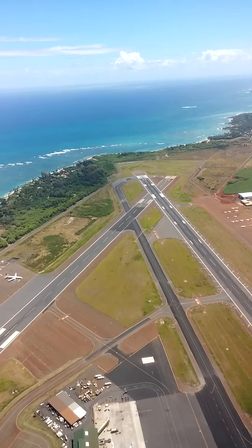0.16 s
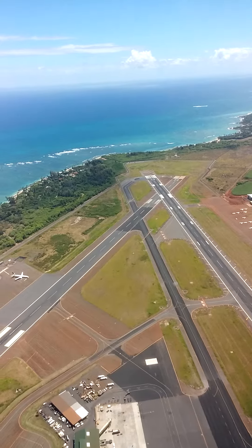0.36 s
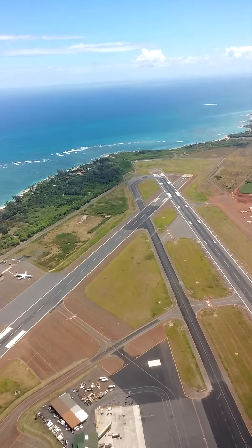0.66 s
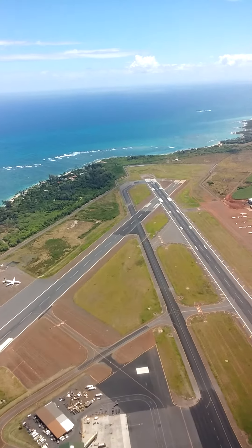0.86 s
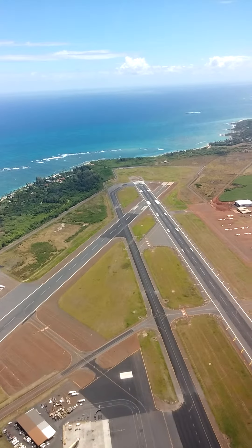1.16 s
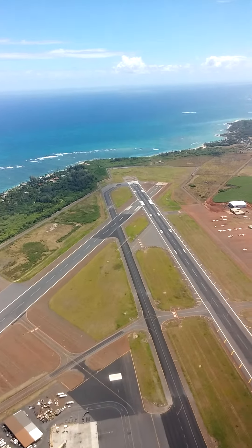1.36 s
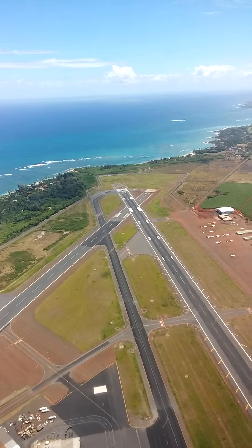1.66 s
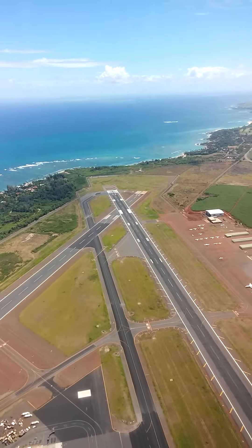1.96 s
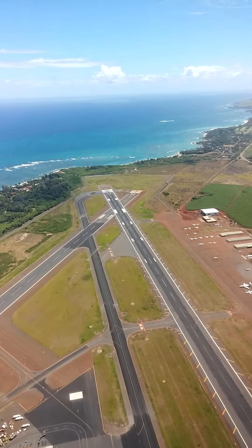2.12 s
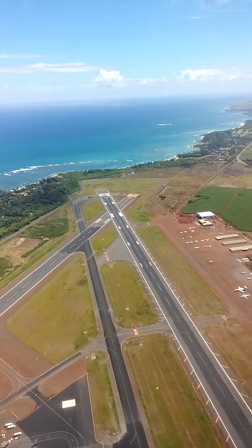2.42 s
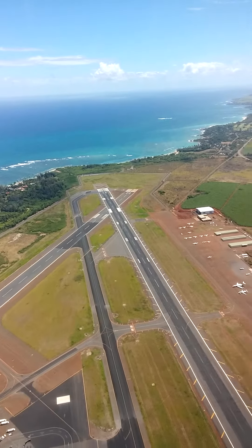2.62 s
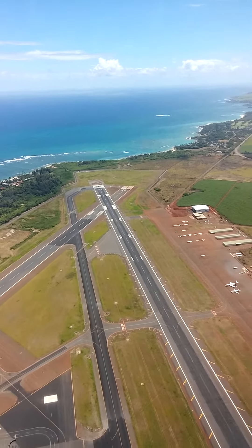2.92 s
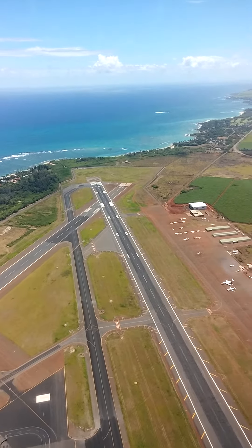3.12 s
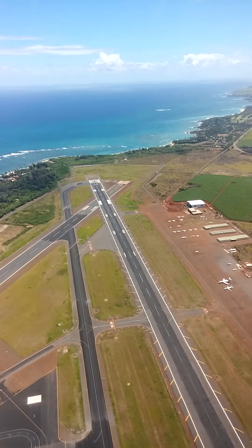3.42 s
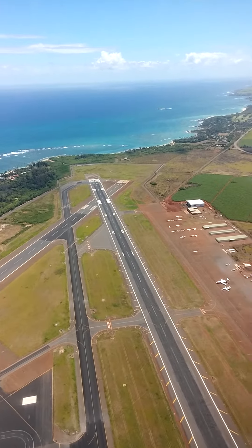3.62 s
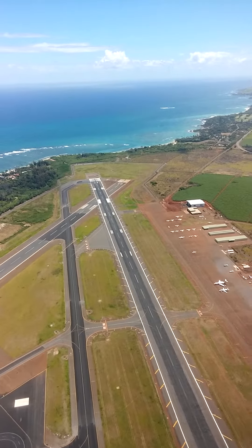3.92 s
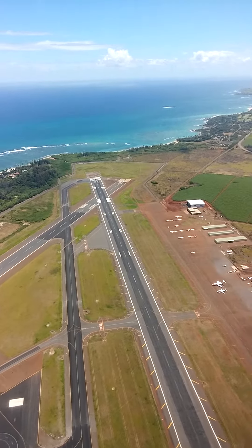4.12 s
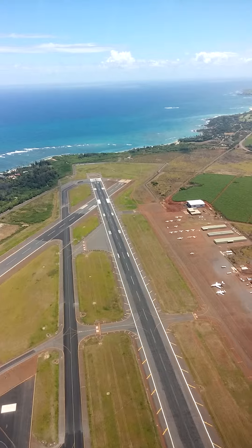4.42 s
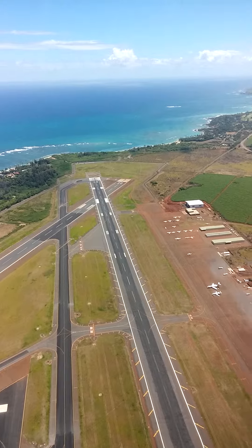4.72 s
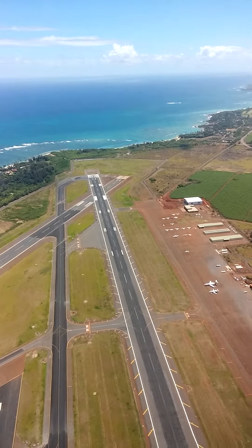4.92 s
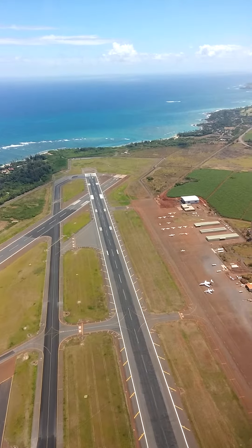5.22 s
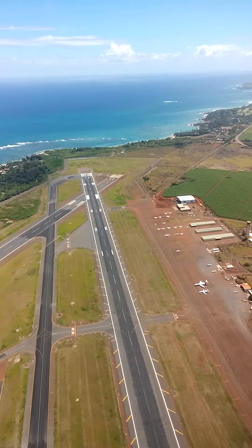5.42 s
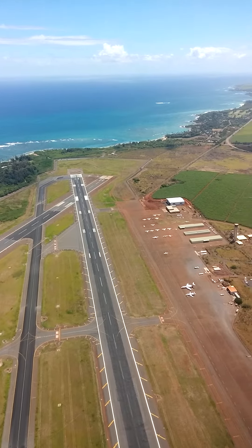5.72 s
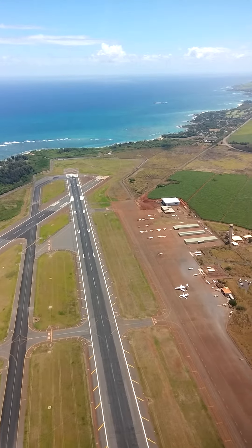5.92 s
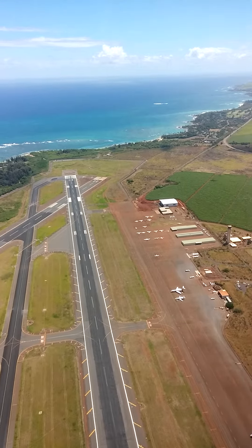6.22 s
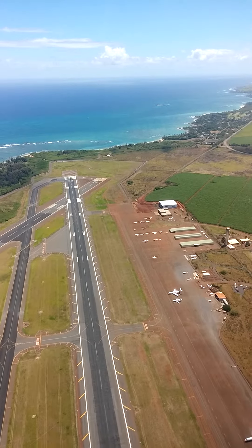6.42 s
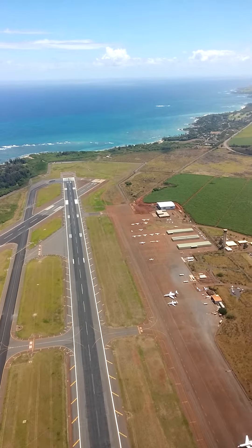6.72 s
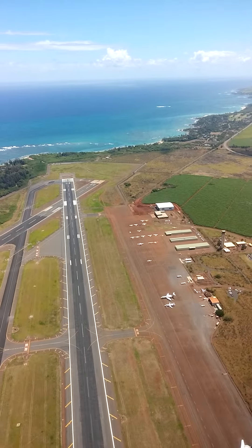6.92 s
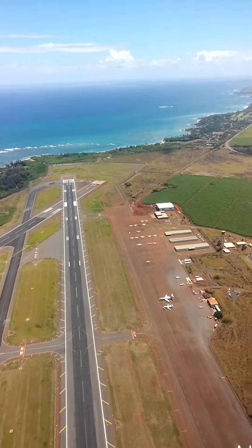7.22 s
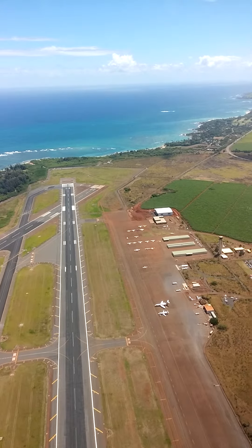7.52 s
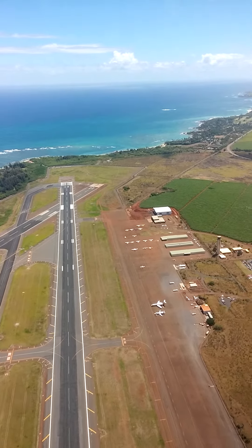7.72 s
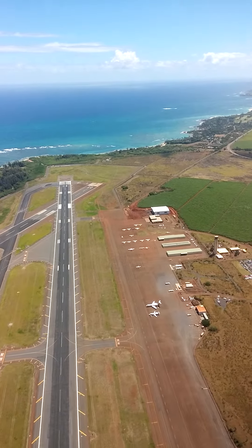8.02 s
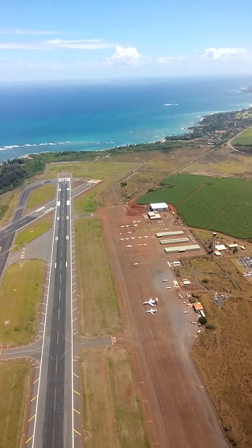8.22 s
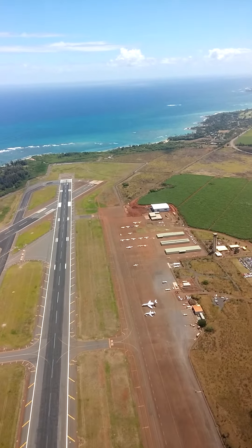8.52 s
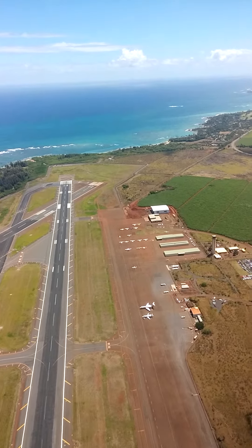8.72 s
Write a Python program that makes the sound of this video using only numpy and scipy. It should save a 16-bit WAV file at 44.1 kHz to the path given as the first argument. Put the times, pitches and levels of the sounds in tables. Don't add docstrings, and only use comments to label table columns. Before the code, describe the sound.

Heard from inside a helicopter in flight, blades beat about nineteen times a second in a dense, buffeting throb. Low rumble, rushing air and engine noise fill the cabin, with a thin gear whine above. Hiss opens up early, then thins after a few seconds, while the blade throb and panel hum harden later. Small fittings tick. The close microphone is overloaded, so the noise chops and pumps with each beat.

```python
import sys
import numpy as np
from scipy import signal
from scipy.fft import rfft, irfft, next_fast_len
from scipy.io import wavfile
from scipy.ndimage import uniform_filter1d, minimum_filter1d, map_coordinates

SR = 44100
rng = np.random.default_rng(int(sys.argv[2]) if len(sys.argv) > 2 else 0)


def voltage_ratio(decibels):
    exponent = np.asarray(decibels, float) / 20
    return 10 ** exponent


def master_out(mix):
    frames = np.transpose(np.atleast_2d(mix))
    ceiling = np.clip(frames, -1, 1)
    pcm = np.round(ceiling * 32767).astype(np.int16)
    wavfile.write(sys.argv[1], SR, pcm)


N = 390726
TOP_HZ = 15850


def unit(x):
    return x / np.sqrt(np.mean(x ** 2) + 1e-20)


def along(points, hz):
    f, v = np.transpose(points)
    return np.interp(np.log(hz + 1), np.log(f + 1), v)


def curves(rows):
    s, *cols = np.transpose(rows)
    return [np.interp(np.arange(N) / SR, s, c) for c in cols]


def wobble(rate):
    knots = rng.standard_normal(int(N * rate / SR) + 4)
    return map_coordinates(knots, [np.arange(N) * rate / SR])


def filtered(x, response):
    m = next_fast_len(N + 8192)
    return irfft(rfft(x, m) * response(np.fft.rfftfreq(m, 1 / SR)), m)[..., :N]


def panned(x, pan_db):
    return np.array([x * voltage_ratio(pan_db / 2), x * voltage_ratio(-pan_db / 2)])


def rush(spectrum, patchy_db):
    # pitch_hz, correlation (-1 to 1)
    likeness = [(60, 0.97), (130, 0.99), (290, 0.88), (640, 0.61), (1410, -0.32), (3100, 0.08),
                (6820, 0.02), (15000, -0.34)]
    z = signal.stft(rng.standard_normal((2, N)), nperseg=512)[2]
    field = uniform_filter1d(rng.standard_normal(z.shape[1:]), size=6, axis=0)
    field = uniform_filter1d(field, size=8, axis=1)
    pair = signal.istft(z * voltage_ratio(patchy_db * unit(field)), nperseg=512)[1][:, :N]

    def mid_side(hz):
        turn = np.arccos(np.clip(along(likeness, hz), -1, 1)) / 2
        return voltage_ratio(along(spectrum, hz)) * [np.cos(turn), np.sin(turn)]

    mid, side = filtered(pair, mid_side)
    return np.array([mid + side, mid - side]) / np.std(mid)


def rotor_load():
    # start_s, load (0-1)
    bite = [
        (0, 0),
        (2, 0.37),
        (4, 0.07),
        (5.5, 0.24),
        (6.5, 1),
        (8.9, 0.75),
    ]
    return curves(bite)[0]


def mesh_turns():
    # start_s, pitch_hz
    mesh_speed = [(0, 1705.4), (.5, 1704.6), (1, 1703.5), (1.5, 1702.9), (2, 1702.9), (2.5, 1703.4),
                  (3.5, 1705.1), (4, 1706), (4.5, 1706.6), (6, 1707.6), (6.5, 1708.2), (7, 1709.1),
                  (8, 1711.2), (8.5, 1711.4), (8.9, 1711.4)]
    return np.cumsum(curves(mesh_speed)[0]) / SR


def blade_angle():
    teeth_per_blade, first_crest = 88.105, .635
    return 2 * np.pi * (mesh_turns() / teeth_per_blade - first_crest)


def orders(table, angle, scatter, unsteady_db, pace):
    load, total = rotor_load(), 0
    for k, early_db, late_db in table:
        level_db = early_db + load * (late_db - early_db) + unsteady_db * wobble(pace)
        total = total + voltage_ratio(level_db) * np.cos(round(k) * angle + scatter * wobble(pace))
    return total


def blade_thump(angle):
    harmonics = [
        (2, -23.5, -28.5),
        (3, -17, -20.5),
        (4, -15.5, -27.5),
        (5, -29, -15),
    ]
    return orders(harmonics, angle, scatter=0.15, unsteady_db=3.1, pace=5)


def panel_hum(angle):
    resonances = [(6, -28, -18.5), (7, -28, -23), (8, -21.5, -14.5), (12, -34, -16), (13, -27, -21.5),
                  (16, -48, -18.5), (17, -34, -24.5), (19, -31, -23), (20, -27.5, -22.5)]
    return orders(resonances, angle, scatter=1.05, unsteady_db=3.5, pace=9)


def low_rumble():
    # pitch_hz, level_db per Hz
    spectrum = [(15, -46), (30, -59), (50, -6), (80, 4.5), (120, -1), (170, -3.5), (260, -42), (400, -48.5)]
    # start_s, level_db
    buffet = [(0, -11), (.85, -9.5), (1.5, -16.5), (2.4, -12), (2.9, -10), (4.5, -15), (5.6, -6.5),
              (6, -12), (7.5, -11.3), (8, -10.5), (8.86, -11.5)]
    return voltage_ratio(curves(buffet)[0] - 2.0) * rush(spectrum, patchy_db=0.1)


def air_levels():
    # start_s, roar_db
    flow = [(0, -13.5), (.5, -14), (.95, -17.5), (2.2, -17), (2.6, -14), (3.3, -15), (4.2, -16), (5, -14.5),
            (5.9, -16), (6.9, -16), (8.86, -16.5)]
    # start_s, hiss_db
    gap = [
        (0, -35.5),
        (.44, -35.5),
        (.53, -28.5),
        (2.3, -29.5),
        (3.3, -30),
        (3.65, -34),
        (5.5, -34),
        (8.86, -37.5),
    ]
    # center_s, swell_db, half_length_s
    gusts = [(0.87, -1.6, 0.03), (1.39, 0.6, 0.13), (1.567, -2.5, 0.032), (1.913, 1.4, 0.073),
             (2.18, -0.5, 0.034), (2.396, 2, 0.08), (2.9, -3.5, 0.03), (3.167, 2.1, 0.17),
             (3.7, -0.7, 0.07), (3.98, 3.5, 0.022), (4.173, 1.5, 0.024), (4.335, -2, 0.055),
             (4.567, 1, 0.13), (4.8, -1.1, 0.022), (4.953, 1.5, 0.088), (5.377, -2.5, 0.029),
             (5.663, 2.5, 0.054), (5.92, -1, 0.045), (6.12, 0.5, 0.021), (6.46, -2, 0.036),
             (6.727, 2.7, 0.025), (6.8, -2.4, 0.019), (7.277, -2.5, 0.04), (7.58, 1.5, 0.26),
             (7.757, -6.5, 0.019), (8.406, -7.5, 0.016), (8.594, 4, 0.024), (8.764, -1, 0.045)]
    t = np.arange(N) / SR
    swell_db = sum(db * np.exp(-.5 * ((t - s) / half) ** 2) for s, db, half in gusts)
    flow_db, gap_db = curves(flow)[0], curves(gap)[0]
    engine_db = flow_db - 17 - 0.74 * t
    return [db + swing * swell_db + 0.72 * wobble(11)
            for db, swing in [(flow_db, 1.16), (engine_db, 1.5), (gap_db, 1.8)]]


def air_roar(roar_db, gust):
    # pitch_hz, level_db per Hz
    spectrum = [(60, -22.5), (110, -6.5), (170, -2), (260, -4.5), (400, -9.5), (700, -12.5), (1000, -15.5),
                (1250, -18.5), (1500, -34), (2200, -37), (4000, -100)]
    return voltage_ratio(roar_db + 5.0 + 2.3 * gust) * rush(spectrum, patchy_db=2.24)


def engine_noise(engine_db, gust):
    # pitch_hz, level_db per Hz
    spectrum = [(900, -1), (1400, 8.5), (1900, 2), (2250, 2.5), (2600, -3.5), (3300, -7.5), (4500, -14),
                (6000, -13), (10000, -27), (16000, -45)]
    return voltage_ratio(engine_db + 2.0 + 2.1 * gust) * rush(spectrum, patchy_db=2.0)


def gearbox():
    # start_s, left_db, right_db
    whine = [(0, -33, -36), (.8, -34.5, -41), (1.6, -41.5, -33.5), (2.75, -35, -30), (3.5, -36, -43),
             (4, -34.5, -37), (4.6, -33.5, -47), (6.4, -35, -48), (6.9, -40, -44), (7.3, -40, -49),
             (8.1, -44, -48), (8.86, -48, -38)]
    shafts = [
        (0.7587, -38, -6),
        (1.0451, -49.5, -19),
        (1.5133, -54.5, 1.5),
        (1.891, -65.5, 34),
    ]
    turns, load = mesh_turns(), rotor_load()
    flutter_db = (1.8 + 1.3 * load) * wobble(36)
    drift = .9 * wobble(6) + .25 * wobble(40)
    tones = voltage_ratio(np.array(curves(whine)) + 6.5 + flutter_db) * np.sin(2 * np.pi * turns + drift)
    for ratio, db, side_db in shafts:
        swell_db = 2.2 * wobble(9) - 4 * load
        tone = np.sin(2 * np.pi * ratio * turns + 1.5 * wobble(9.1))
        tones += panned(voltage_ratio(db + swell_db) * tone, side_db)
    return tones


def cabin_drone(gust):
    # pitch_hz, level_db per Hz
    spectrum = [(150, -14), (215, -0.5), (250, 1.5), (340, -19), (420, -12), (600, -47.5)]
    return voltage_ratio(-32.5 + 10.5 * rotor_load() + 1.5 * gust) * rush(spectrum, patchy_db=1.5)


def gap_hiss(hiss_db, gust):
    # pitch_hz, level_db per Hz
    spectrum = [(3500, -69), (5200, -27.5), (6300, -7), (7200, -4.5), (8100, 1.5), (9000, 0), (9900, 4.5),
                (10800, -4), (12500, -7), (16000, -8.5)]
    return voltage_ratio(hiss_db + .6 + 1.5 * gust) * rush(spectrum, patchy_db=.9)


def whistles():
    # pitch_hz, width_hz, early_db, late_db
    cavities = [(1193, 77, -36, -45), (2200, 150, -55, -41), (2914, 240, -49.5, -52), (3840, 260, -57, -51),
                (4735, 97, -59, -51.5), (5860, 250, -75, -47.5), (8040, 200, -54, -42),
                (9600, 200, -60, -47.5), (11400, 90, -50, -67)]
    load, out = rotor_load(), np.zeros((2, N))
    for hz, width, early_db, late_db in cavities:
        tone = filtered(rng.standard_normal((2, N)), lambda f: 1 / (1 + (2 * (f - hz) / width) ** 2))
        level_db = early_db + load * (late_db - early_db) + 1.5 * wobble(20)
        out += voltage_ratio(level_db) * unit(tone)
    return out


def shaken(angle, hiss_db):
    # pitch_hz, level_db over the hiss
    loose_parts = [
        (8140, 2),
        (9600, 2),
        (11480, -4),
    ]
    chance, lag_s = .07, .026
    crests = np.flatnonzero(np.diff(np.floor(angle / (2 * np.pi))))
    luck = rng.random((len(crests), len(loose_parts)))
    spread = rng.standard_normal((len(crests), 3))
    ticks = []
    for i, k in np.argwhere(luck < chance):
        hz, over_db = loose_parts[k]
        start_s = crests[i] / SR + lag_s + 0.001 * spread[i, 0]
        level_db = hiss_db[crests[i]] + over_db + 2 * spread[i, 1]
        ticks.append((start_s, level_db, hz * (1 + .006 * spread[i, 2])))
    return ticks


def fittings(light):
    # start_s, peak_db, pitch_hz
    hard = [(.0553, -25, 8200), (.2653, -27, 8200), (.9428, -19, 9500), (1.041, -19, 8130),
            (1.0964, -24, 8030), (1.0979, -17, 9600), (1.3543, -20, 8240), (1.4077, -18, 9600),
            (1.6896, -24, 9700), (1.8741, -26, 8210), (2.0837, -20, 11500), (2.1869, -27, 11600),
            (3.1403, -25, 9800), (3.2151, -21, 9600), (3.2161, -27, 8000), (3.3677, -21, 8100),
            (3.5234, -25, 9600), (3.8427, -27, 11500), (4.0911, -21, 9600), (4.1285, -23, 8090),
            (4.4578, -27, 8200), (4.5531, -18, 9590), (4.5555, -22, 8100), (5.0639, -24, 9800),
            (5.691, -20, 9580), (6.1065, -23, 9590), (6.1634, -24, 9610), (7.3721, -30, 8160),
            (8.3619, -30, 8160), (8.5794, -24, 8100)]
    out, t = np.zeros(N + SR), np.arange(SR // 20) / SR
    for s, db, hz in list(hard) + light:
        envelope = voltage_ratio(db + 10.5 - 60 * t / 0.025) * (1 - np.exp(-t / 0.0019))
        out[round(s * SR):][:len(t)] += envelope * np.sin(2 * np.pi * hz * t)
    return out[:N]


def creak():
    # center_s, half_length_s, level_db, pitch_hz
    s, half, db, hz = (8.585, .035, -27, 1170)
    t = np.arange(N) / SR
    return voltage_ratio(db) * np.exp(-.5 * ((t - s) / half) ** 2) * np.sin(2 * np.pi * hz * t + .6 * wobble(40))


def overload(pressure, limit, knee, entry):
    past = 1 / (1 + np.exp(np.clip((limit - pressure) / knee, -50, 50)))
    keep = np.exp(-1 / (entry * SR))
    return np.minimum(past, signal.lfilter([1 - keep], [1, -keep], past))


def capsules(thump, rumble, fine, angle):
    unheard = .5 * np.cos(angle + .1) + .1 * wobble(30) - .1 * rotor_load() + .2 * wobble(240)
    pressure = 1.4 * thump + .3 * rumble.mean(0) + unheard
    stiff = overload(pressure, limit=.55, knee=.02, entry=.0008)
    kick = .42 * signal.lfilter([1, -1], [1, -np.exp(-1 / (.0009 * SR))], stiff)
    return thump + kick + rumble * voltage_ratio(-4 * stiff) + fine * voltage_ratio(-20 * stiff)


def scene():
    angle = blade_angle()
    roar_db, engine_db, hiss_db = air_levels()
    gust = .7 * wobble(34) - .7 * np.cos(angle + .3)
    thump, rumble = blade_thump(angle), low_rumble()
    fine = air_roar(roar_db, gust) + panel_hum(angle) + engine_noise(engine_db, gust)
    fine += gap_hiss(hiss_db, gust) + cabin_drone(gust)
    sag_db = hiss_db - uniform_filter1d(hiss_db, size=SR // 2)
    fine += voltage_ratio(0.59 * sag_db) * gearbox() + voltage_ratio(1.44 * sag_db) * whistles()
    fine += fittings(shaken(angle, hiss_db)) + creak()
    return capsules(thump, rumble, fine, angle)


def limited(x, top, hold):
    span = max(int(hold * SR), 1)
    need = np.minimum(1, top / np.maximum(np.abs(x).max(0), 1e-9))
    return x * uniform_filter1d(minimum_filter1d(need, span), span)


def starved(x, share):
    # pitch_hz, level_db re the masking level
    threshold = [(1800, -26), (3000, -10.5), (4000, -11), (5000, -9), (6000, -12), (6800, -30),
                 (10300, -20), (11800, -13.5)]
    hz, _, z = signal.stft([*x, x.mean(0)], SR, nperseg=2048)
    power = uniform_filter1d(np.abs(z) ** 2, size=5, axis=1)
    usual = np.abs(uniform_filter1d(uniform_filter1d(power, size=31, axis=1), size=9, axis=2))
    hiss = usual[:2, (hz > 6500) & (hz < 10500)].mean((0, 1))
    masking = hiss ** share * usual ** (1 - share)
    weak = power < masking * voltage_ratio(2 * along(threshold, hz))[:, None]
    weak = weak & (hz > 1800)[:, None]
    lost = uniform_filter1d(1. * weak, size=5, axis=1) > 0
    lost = lost[:2] | lost[2] & (hz < 4300)[:, None]
    kept = z[:2] * ~lost * (hz < TOP_HZ)[:, None]
    return signal.istft(kept, SR, nperseg=2048)[1][:, :N]


def low_pass(x):
    return signal.sosfilt(signal.butter(12, 16370, fs=SR, output="sos"), x)


def record(dry):
    # pitch_hz, level_db
    left_port = [(500, -0.74), (750, -1.5), (1250, -0.5), (2500, 4.5), (4800, 2.5), (7000, 4), (9000, -8.5),
                 (10500, -14.5), (12000, -14), (12800, -37), (16000, -45)]
    right_port = [(500, -0.5), (750, 0), (1250, -5.5), (2500, 2.5), (4800, 6.5), (8000, 2), (16000, -4)]

    def port_response(hz):
        color_db = np.array([along(left_port, hz), along(right_port, hz)])
        return voltage_ratio(color_db * np.clip(hz / 200 - 1, 0, 1)) * (hz < TOP_HZ)

    ports = filtered(dry, port_response)
    held = limited(voltage_ratio(.4) * ports, top=1.015, hold=.006)
    mix = starved(np.clip(held, -1, 1), share=0.56)
    return low_pass(mix)


dry = scene()
out = record(dry)
master_out(out)
```